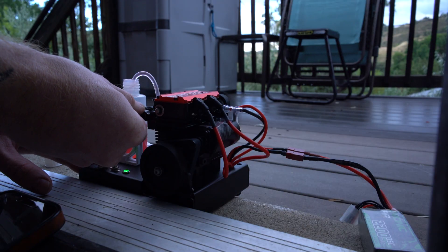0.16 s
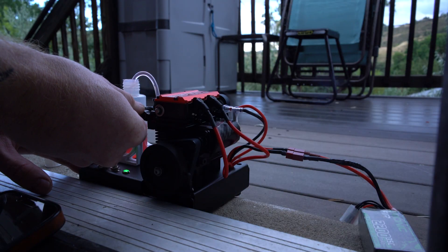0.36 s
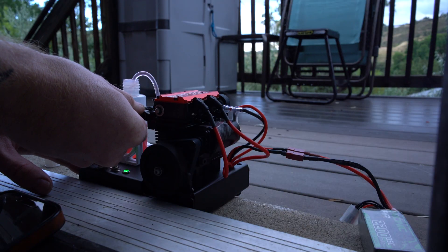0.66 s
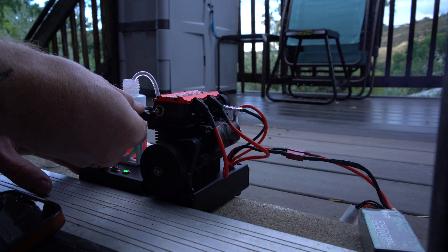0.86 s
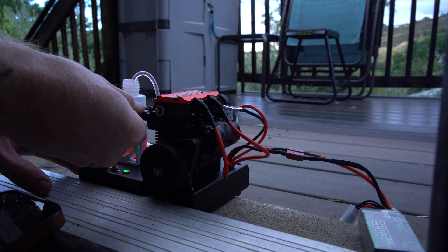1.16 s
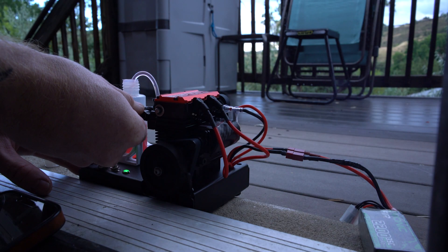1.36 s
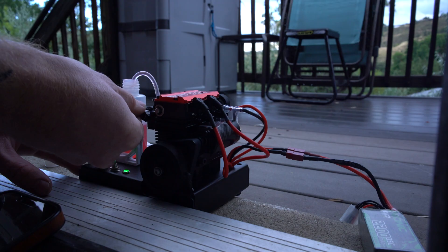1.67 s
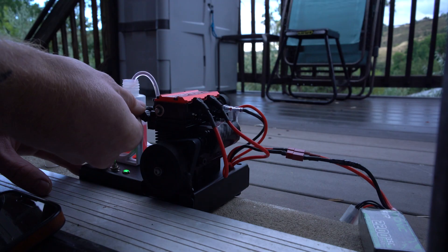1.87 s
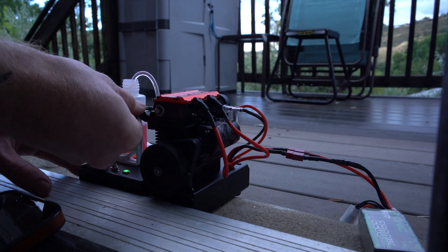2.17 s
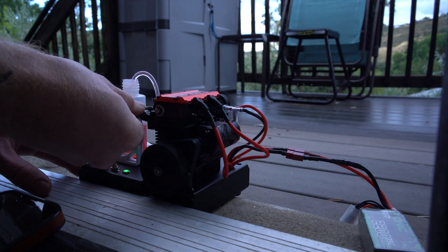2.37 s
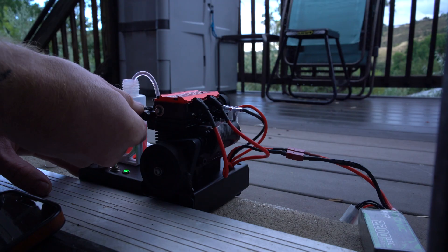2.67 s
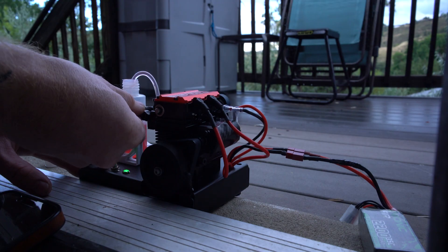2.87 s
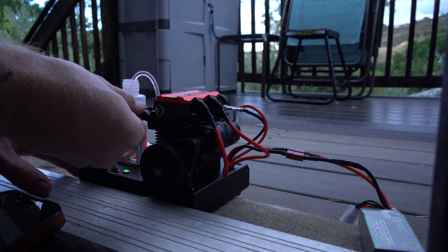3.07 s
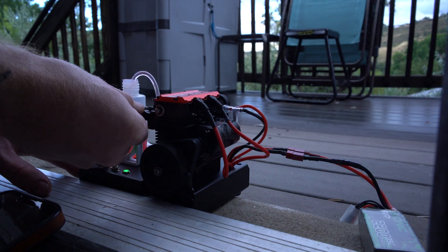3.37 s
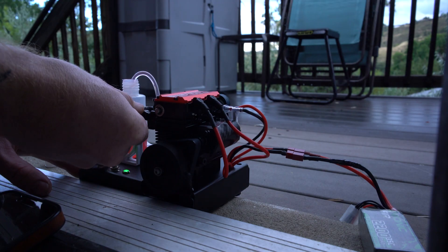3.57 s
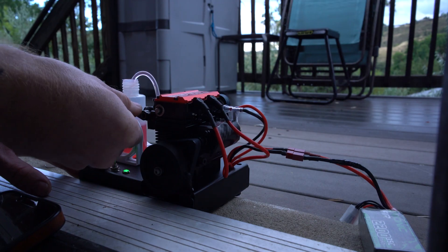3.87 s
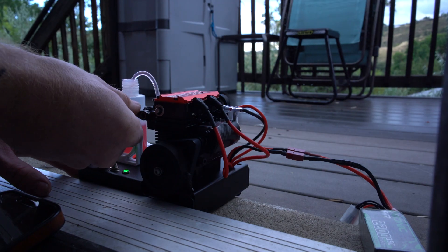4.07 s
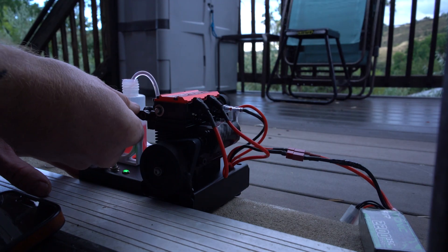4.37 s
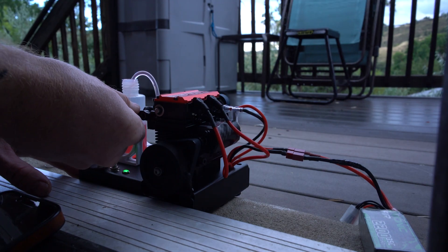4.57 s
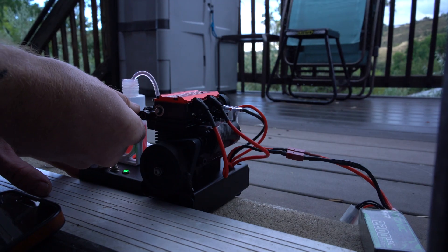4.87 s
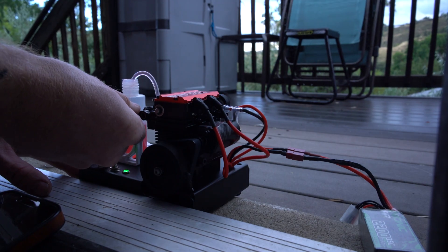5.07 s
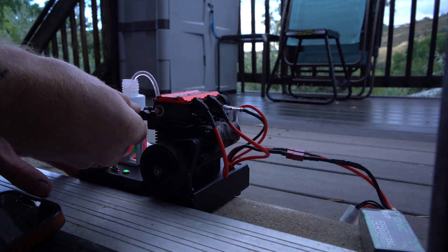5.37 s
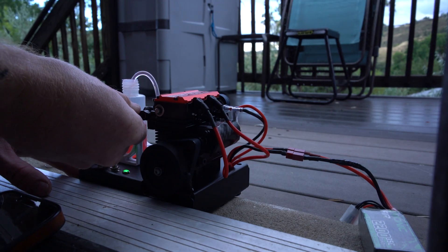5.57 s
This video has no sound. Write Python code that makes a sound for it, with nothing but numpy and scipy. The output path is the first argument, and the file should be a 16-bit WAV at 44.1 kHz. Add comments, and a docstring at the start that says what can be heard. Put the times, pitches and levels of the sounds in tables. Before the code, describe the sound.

Close up on an outdoor deck, a small model engine is spun by an electric starter without ever running. A fast, even chugging carries a squeaky gear whine, rasp and fine metallic ticks. Scattered cracking exhaust pops sound over it at first, thin out for a couple of seconds, then return in a busy, uneven sputter while the cranking holds its speed.

```python
"""On a wooden porch, an electric starter cranks a miniature two-cylinder four-stroke engine that
never catches. The meshing gear teeth whine and rasp, and the drive squeals and groans under the
periodic load of compression. Valves tick, and both cylinders puff through their open exhausts.
Now and then a charge fires with a sharp pop: a pulse of gas under a turbulent crack. The pulses
excite the modes of the deck boards; the ticks and cracks excite those of the metal casing."""
import sys
import numpy as np
from scipy import signal
from scipy.fft import rfft, irfft
from scipy.io import wavfile

SR = 44100
rng = np.random.default_rng(int(sys.argv[2]) if len(sys.argv) > 2 else 0)


def wav_out(sig):
    """Save sig, one row per channel (or a flat mono array), as 16-bit PCM at SR to the path in sys.argv[1]."""
    wavfile.write(sys.argv[1], SR, np.round(np.clip(np.atleast_2d(sig).T, -1, 1) * 32767).astype(np.int16))


N = 252163
TIME = np.arange(N) / SR
PULSE_MS = np.arange(SR // 100) * 1000 / SR  # time axis of one short transient


def amp(db):
    """Amplitude ratio of a level in decibels."""
    return 10 ** (np.asarray(db) / 20)


def unit(x):
    """Normalisation to an rms of 1."""
    return x / np.sqrt(np.mean(x ** 2) + 1e-20)


def read(points, hz):
    """Interpolation along a logarithmic frequency axis."""
    frequency, value = np.transpose(points)
    return np.interp(np.log(hz + 1), np.log(frequency), value)


def add(mix, start_s, sound):
    """Superposition: a sound joins the mix at start_s."""
    part = mix[..., max(round(start_s * SR), 0):][..., :sound.shape[-1]]
    part += sound[..., :part.shape[-1]]


def shape(x, points):
    """Zero-phase filtering by a gain curve in decibels."""
    size = x.shape[-1]
    return irfft(rfft(x) * amp(read(points, np.fft.rfftfreq(size, 1 / SR))), size)


def noise(points, size=N):
    """Two uncorrelated coloured noises, mid and side, with a joint rms of 1."""
    return unit(shape(rng.standard_normal((2, size)), points))


def wander(hz):
    """Random modulation of rms 1, low-passed at hz."""
    rolloff = 1 + (np.fft.rfftfreq(N, 1 / SR) / hz) ** 4
    return unit(irfft(rfft(rng.standard_normal(N)) / rolloff, N))


def moments(cycles, phase):
    """Periodic timing: the seconds at which the engine passes one phase (0-1) of its cycle."""
    passes = np.arange(np.ceil(cycles[0] - phase), cycles[-1] - phase) + phase
    return np.interp(passes, cycles, TIME)


# Cranking speed in four-stroke cycles: time_s, cycle_rate_hz
CRANK_SPEED = [(0.0, 22.35), (0.4, 22.701), (0.9, 22.609), (1.4, 22.481), (1.75, 22.359), (2.3, 22.446),
               (2.8, 22.517), (3.3, 22.325), (3.9, 22.375), (4.4, 22.274), (4.9, 22.346), (5.3, 22.143),
               (5.7, 22.19)]

def crank(start_cycles=0.562):
    """Phase is the integral of rate: the engine's running position in cycles."""
    return start_cycles + np.cumsum(np.interp(TIME, *np.transpose(CRANK_SPEED))) / SR


# Spectrum of the outdoor air: frequency_hz, relative_db
AIR_SPECTRUM = [(20, -16), (45, 2), (80, 12), (250, 12), (600, -42), (2000, -33), (16000, -37)]

def air(level_db=-66):
    """Ambient noise: a steady floor with its energy mostly in the bass."""
    return amp(level_db) * noise(AIR_SPECTRUM)


# Colour of the porch's reflections: frequency_hz, gain_db
PORCH_REFLECTION = [(150, -16), (500, -10), (1000, -2), (2000, -3), (4000, 2), (16000, 2)]
# Reverberation time of the porch: frequency_hz, t60_s
PORCH_DECAY = [(100, 0.68), (500, 0.063), (2000, 0.4), (8000, 0.16), (16000, 0.097)]

def porch(x, first_ms=1.1, early_db=9, early_ms=12):
    """Reverberation: dense early reflections from floor, wall and engine base, then a short tail."""
    t = TIME[:SR // 2]
    taps = rng.standard_normal((2, len(t))) * (rng.random((2, len(t))) < .12)
    taps *= (t > first_ms / 1000) * (1 + amp(early_db) * np.exp(-t * 1000 / early_ms))
    hz, delay_s, spectra = signal.stft(taps, SR, nperseg=256)
    decay = amp(-60 * delay_s / read(PORCH_DECAY, hz)[:, None])
    response = signal.istft(spectra * decay, SR, nperseg=256)[1]
    response /= np.linalg.norm(response[0])
    return signal.fftconvolve(shape(x, PORCH_REFLECTION)[None], response, axes=1)[:, :N]


# Modes of the deck boards and engine base: pitch_hz, relative_db, t60_s
DECK_MODES = [(101, -27, 0.064), (261.8, -17.5, 0.18), (325, -21.5, 0.13), (416, -11, 0.021),
              (547.5, -16.5, 0.048), (746, -42, 0.02)]

def deck(beats):
    """Modal response: the boards ring as damped sinusoids after each beat of the engine."""
    t = TIME[:SR // 4]
    ring = sum(amp(db - 60 * t / t60) * np.sin(2 * np.pi * hz * t) for hz, db, t60 in DECK_MODES)
    return signal.fftconvolve(beats, ring)[:N] * 1000 / SR


# Modes of the metal casing and ports: pitch_hz, bandwidth_hz, gain_db
CASING_MODES = [(2555, 163, 0), (3125, 130, -3.5), (5050, 90, -8), (6700, 97, -18), (8350, 81, 0),
                (12600, 310, -24), (14600, 450, -8)]

def casing(x):
    """Resonance: the engine's metal adds short rings to the sound that excites it."""
    return x + sum(amp(db) * signal.lfilter(*signal.iirpeak(hz, hz / width, SR), x)
                   for hz, width, db in CASING_MODES)


# Harmonics of the rocking base: multiple_of_cycle_rate, level_db
ROCKING_HARMONICS = [(3, -64.5), (4, -65.5), (5, -63), (7, -60.5), (8, -62)]

def rocking(cycles, phase=0.518):
    """Forced vibration: the pistons shake the base in a low chug, once a cycle."""
    return sum(amp(db) * np.cos(2 * np.pi * order * (cycles - phase)) for order, db in ROCKING_HARMONICS)


# Ticks and spits of the valve train: phase_cycles, decay_ms, relative_db
VALVE_TICKS = [(0.099, 1.75, -46), (0.146, 2, -44), (0.232, 1.7, -45.5), (0.37, 4.75, -43.5),
               (0.613, 0.72, -42), (0.87, 0.55, -43)]
# Spectrum of a tick: frequency_hz, relative_db
TICK_SPECTRUM = [(300, -37), (1000, 2.5), (2100, -5.5), (3000, 0.5), (4200, -2), (6000, -1.5), (8300, -8.5),
                 (11000, -7.5), (14000, -4), (16000, -6)]

def valves(cycles, gain_db=3, uneven_db=2.5, rattle_per_s=110, rattle_db=-49, rattle_ms=0.67):
    """Impact noise: the valves tick at set phases of the cycle, and loose parts rattle at random."""
    ticks, ms = np.zeros(N), PULSE_MS
    attack = 1 - np.exp(-ms / 0.21)
    for phase, decay_ms, db in VALVE_TICKS:
        for s in moments(cycles, phase):
            late, loud = rng.standard_normal(2)
            add(ticks, s + .00012 * late, amp(db + uneven_db * loud) * np.exp(-ms / decay_ms) * attack)
    struck = rng.random(N) < rattle_per_s / SR
    knocks = struck * amp(rattle_db + 0.6 * np.minimum(rng.exponential(1, N), 3.5))
    rattle = signal.fftconvolve(knocks, np.exp(-ms / rattle_ms))[:N]
    return amp(gain_db) * (ticks + rattle) * noise(TICK_SPECTRUM)


# Where the engine drags on the starter: phase_cycles, width_cycles, load_fraction
LOAD_PEAKS = [(0.195, 0.02, 0.7), (0.43, 0.075, 0.97), (0.8, 0.04, 0.8)]
# Where the engine coasts: phase_cycles, width_cycles
COAST_SPANS = [(0.03, 0.047), (0.7, 0.048)]
# Spectrum of the drive's rasp: frequency_hz, relative_db
RASP_SPECTRUM = [(100, -4), (450, -4.5), (650, 0.5), (850, 7), (1150, -16.5), (1480, 7), (2150, -4),
                 (2650, -6), (3150, 2), (4200, -3.5), (5300, -0.5), (7200, 1), (9500, -3.5), (14000, -4.5),
                 (16000, -24)]

def starter(cycles, teeth_per_cycle=156.2, sag=0.036, flutter=0.004, flutter_hz=180,
            whine_db=-51.3, duck_db=2.5, coast_db=6.5, flicker_db=1.8,
            rasp_db=-49, rasp_load_db=3.2, grit_db=1.5):
    """Gear-mesh tone and rasp: load lowers the whine and lifts the rasp; coasting swells the whine."""
    def bump(phase, width):
        return np.exp(-(((cycles - phase + .5) % 1 - .5) / width) ** 2)
    load = sum(size * bump(phase, width) for phase, width, size in LOAD_PEAKS)
    coast = sum(bump(phase, width) for phase, width in COAST_SPANS)
    speed_change = flutter * wander(flutter_hz) - sag * load  # fraction of the cranking speed
    sway = np.cumsum(speed_change * np.gradient(cycles))
    angle = 2 * np.pi * teeth_per_cycle * (cycles + sway)
    partials = [(1, 0), (1 / 2, -17), (2, -14)]  # multiple_of_mesh_rate, relative_db
    whine = sum(amp(db + flicker_db * wander(190)) * np.sin(k * angle) for k, db in partials)
    rasp = noise(RASP_SPECTRUM) * amp(rasp_db + rasp_load_db * load + grit_db * wander(570))
    return whine * amp(whine_db - duck_db * load + coast_db * coast), rasp


def groan(cycles, phase=.465, pitch_hz=850, level_db=-46, half_width_ms=5.0):
    """Vibration under load: between exhaust beats the drive groans about an octave below its squeal."""
    out, ms = np.zeros(N), np.arange(-SR // 70, SR // 70) * 1000 / SR
    envelope = np.exp(-(ms / half_width_ms) ** 2)
    for s in moments(cycles, phase):
        loud, sharp, turn = rng.standard_normal(3)
        tone = np.sin(2 * np.pi * pitch_hz * (1 + 0.013 * sharp) * ms / 1000 + np.pi * turn)
        add(out, s + ms[0] / 1000, amp(level_db + loud) * envelope * tone)
    return out


def squeal(cycles, phase=.195, level_db=-33.5, start_hz=1770, end_hz=1600, glide_ms=2.2,
           rise_ms=1.18, fall_ms=2.1, drag_db=-13, drag_delay_ms=9, drag_width_ms=7, judder_hz=140):
    """Strain at top compression: the drive gives a falling chirp, then a weaker, noise-modulated drag."""
    out, ms = np.zeros(N), np.arange(-SR // 200, SR // 40) * 1000 / SR
    hz = end_hz + (start_hz - end_hz) / (1 + np.exp(ms / glide_ms))
    strain = np.exp(-(ms / np.where(ms < 0, rise_ms, fall_ms)) ** 2)
    drag = amp(drag_db) * np.exp(-((ms - drag_delay_ms) / drag_width_ms) ** 2)
    lowpass = signal.butter(2, judder_hz, fs=SR, output="sos")
    for s in moments(cycles, phase):
        late, loud, sharp, turn = rng.standard_normal(4)
        angle = 2 * np.pi * np.cumsum(hz * (1 + .015 * sharp)) / SR + np.pi * turn
        judder = unit(signal.sosfilt(lowpass, rng.standard_normal(len(ms))))
        tone = strain * np.sin(angle) + drag * judder * np.cos(angle)
        add(out, s + ms[0] / 1000 + .0002 * late, amp(level_db + loud) * tone)
    return out


def blowdown(pitch_ratio, shut_hz=385, open_hz=1120, opens_ms=3.44, opening_ms=0.26,
             peak_ms=2.455, rise_ms=2.56, fall_ms=1.34, tail_db=-24, tail_ms=9):
    """Cavity resonance: gas swings briefly in cylinder and port, rising in pitch as the valve opens."""
    ms = PULSE_MS * pitch_ratio  # the ratio divides every time and multiplies every frequency
    hz = shut_hz + (open_hz - shut_hz) / (1 + np.exp((opens_ms - ms) / opening_ms))
    swell = np.exp(-((ms - peak_ms) / np.where(ms < peak_ms, rise_ms, fall_ms)) ** 2)
    tail = amp(tail_db) * np.exp(-ms / tail_ms)
    return (swell + tail) * np.sin(2 * np.pi * np.cumsum(hz * pitch_ratio) / SR)


# Two soft exhaust puffs and one higher tap in each cycle: phase_cycles, level_db, pitch_ratio
PUFFS_AND_TAP = [(0.37, -39.2, 1.05), (0.622, -37.6, 1.03), (0.858, -41, 2.6)]
# Colour of the puffs and tap: frequency_hz, gain_db
SOFT_BEAT_COLOUR = [(80, 1), (160, -1.5), (300, -3), (540, 1), (660, -4.5), (900, -5), (1500, -1.5)]

def puffs_and_tap(cycles):
    """Pressure release gives two soft exhaust puffs a cycle; one higher tap follows them."""
    out, fired_s = np.zeros(N), np.transpose(FIRINGS)[0]
    for phase, db, pitch_ratio in PUFFS_AND_TAP:
        for s in moments(cycles, phase):
            late, loud, sharp = rng.standard_normal(3)
            if abs(fired_s - s).min() > .004:  # a pop within 4 ms takes the beat's place
                beat = blowdown(pitch_ratio * (1 + 0.018 * sharp))
                add(out, s + .00005 * late, amp(db + 0.78 * loud) * beat)
    return shape(out, SOFT_BEAT_COLOUR)


def port_whistle(pitch_hz=1050, relative_db=-12, centre_ms=5.45, half_width_ms=3.3):
    """Free oscillation: the open port whistles on for a moment after a charge fires."""
    hz = pitch_hz * rng.uniform(.94, 1.06)
    tone = np.sin(2 * np.pi * (hz * PULSE_MS / 1000 + rng.random()))
    return amp(relative_db) * np.exp(-((PULSE_MS - centre_ms) / half_width_ms) ** 2) * tone


# Charges that fire, relative to a usual charge: start_s, strength_db
FIRINGS = [(0.0039, 4.5), (0.1242, -0.5), (0.3904, 2.5), (0.4015, 5), (0.611, 3), (0.6223, 5.5),
           (0.744, -0.5), (0.8866, 3.5), (0.9746, -0.5), (1.3749, 4.5), (1.4967, 2), (1.5523, 0),
           (1.7215, 3), (2.6564, 2), (2.9233, -6.5), (2.968, 3.5), (3.1016, -7), (3.728, 0), (3.739, 6),
           (3.8174, -0.5), (3.952, 2.5), (4.0079, -3), (4.0408, -2.5), (4.0976, 2.5), (4.1305, 3),
           (4.22, 1), (4.231, 3), (4.3211, -0.5), (4.3664, -1), (4.411, -3.5), (4.456, 0), (4.5341, 1),
           (4.5454, 1), (4.636, -0.5), (4.6687, -1), (4.7246, -4), (4.758, -4.5), (4.7694, 1), (4.859, 1),
           (4.9373, -0.5), (4.9489, 1.5), (5.0387, 1), (5.1285, 0), (5.207, -1), (5.2187, 0.5),
           (5.3423, -2), (5.399, 0.5), (5.5793, -0.5), (5.6124, -5), (5.7141, -2.5)]
# Opening of each cylinder's exhaust: phase_cycles
EXHAUST_PHASES = [0.37, 0.622]
# Colour of a fired thump: frequency_hz, gain_db
THUMP_COLOUR = [(60, -1.5), (105, 7), (165, -1.5), (300, 0.1), (520, -1), (700, 5), (1000, -0.5)]
# Spectra of the crack's low, middle and high bands: frequency_hz, relative_db
BARK_SPECTRUM = [(300, -12.5), (1000, -22), (1650, 3.5), (2050, -9.5), (2650, -3), (3300, -13), (4300, -21),
                 (8000, -33)]
RIP_SPECTRUM = [(2500, -48), (4200, -10), (5300, 0.5), (6500, 6.5), (8300, -3), (10000, -10), (16000, -38)]
FIZZ_SPECTRUM = [(6000, -64), (9300, -1), (11500, 4.5), (14000, 1), (16000, -5)]
# Crack of a usual charge, one row a cylinder: bark_db, rip_db, fizz_db
CRACK_LEVELS = [(-34, -32.5, -29), (-31, -32.5, -34)]
# Brightening of the crack with strength: bark_db_per_db, rip_db_per_db, fizz_db_per_db
CRACK_SLOPES = [0.63, 1.88, 1.56]

def pops(cycles, thump_db=-27, jet_peak_ms=0.94, sharpness=1.75, slowing_per_db=0.016):
    """Combustion pulse: one swing of gas, wider when stronger, under a crack of turbulent jet noise."""
    thumps, cracks = np.zeros(N), np.zeros((2, N))
    jet = (PULSE_MS / jet_peak_ms * np.exp(1 - PULSE_MS / jet_peak_ms)) ** sharpness
    bands = BARK_SPECTRUM, RIP_SPECTRUM, FIZZ_SPECTRUM
    for s, strength_db in FIRINGS:
        phase = np.interp(s, TIME, cycles) % 1
        cylinder = np.argmin(abs(phase - np.array(EXHAUST_PHASES)))
        thump = blowdown(1 - slowing_per_db * strength_db) + port_whistle()
        add(thumps, s, amp(thump_db + strength_db) * thump)
        for db, slope, spectrum in zip(CRACK_LEVELS[cylinder], CRACK_SLOPES, bands):
            burst = jet * noise(spectrum, size=len(jet))
            burst *= np.linalg.norm(jet) / np.linalg.norm(burst, axis=1, keepdims=True)
            add(cracks, s, amp(db + slope * strength_db) * burst)
    return shape(thumps, THUMP_COLOUR), cracks


# Stereo width, as the gain of the side signal: frequency_hz, gain_db
SIDE_GAIN = [(100, -43), (200, -43), (350, -32), (700, -15), (1400, -9.5), (2800, -5), (5600, -3),
             (10000, 0), (15000, -1)]

def scene(beat_room_db=-18, crack_room_db=-13, drive_room_db=-10, crack_side_db=-5):
    """Direct and reflected sound superpose at a close microphone pair, which hears the bass as one."""
    cycles = crank()
    whine, rasp = starter(cycles)
    thumps, cracks = pops(cycles)
    cracks = casing(cracks) * amp([[0], [crack_side_db]])  # straight from the exhaust, so narrower
    beats = thumps + puffs_and_tap(cycles)
    drive = whine + squeal(cycles) + groan(cycles)
    spread = casing(rasp + valves(cycles)) + cracks + air()  # rows: mid, side
    to_porch = amp(beat_room_db) * beats + amp(crack_room_db) * cracks[0] + amp(drive_room_db) * drive
    spread += porch(to_porch)
    direct = beats + deck(beats) + rocking(cycles) + drive
    quadrature = signal.hilbert(direct).imag  # puts the two microphones slightly out of step
    mid, side = spread[0] + direct, shape(spread[1] + quadrature, SIDE_GAIN)
    return np.array([mid + side, mid - side])


# Level difference between the microphones: frequency_hz, left_minus_right_db
MIC_BALANCE = [(550, -1), (1050, 1), (1800, 4), (3300, -0.5), (5500, -0.5), (9000, -2.5), (14000, 3)]

def record(dry, low_cut_hz=55, high_cut_hz=15900):
    """Frequency response: each microphone has its own colour above the bass; both are band-limited."""
    hz = np.fft.rfftfreq(N, 1 / SR)
    balance_db = read(MIC_BALANCE, hz) * np.clip(hz / 400 - 1, 0, 1)
    coloured = irfft(rfft(dry) * amp(np.outer([1 / 2, -1 / 2], balance_db)), N)
    highpass = signal.butter(3, low_cut_hz, "high", fs=SR, output="sos")
    lowpass = signal.firwin(401, high_cut_hz, window=("kaiser", 8), fs=SR)
    return signal.oaconvolve(signal.sosfilt(highpass, coloured), lowpass[None], "same")


dry = scene()
out = record(dry)
wav_out(out)
```